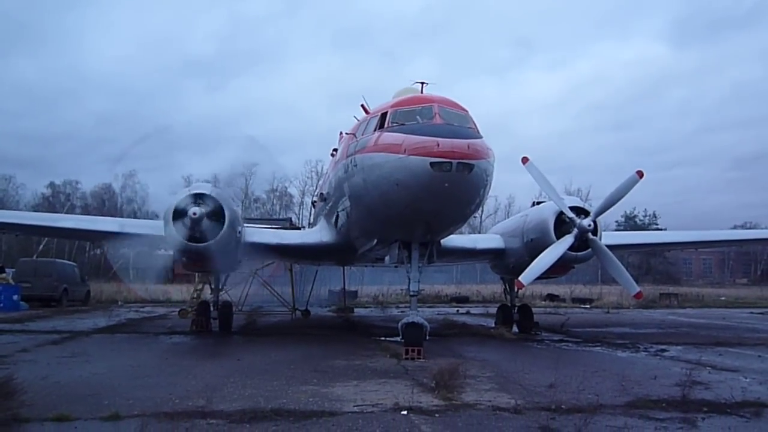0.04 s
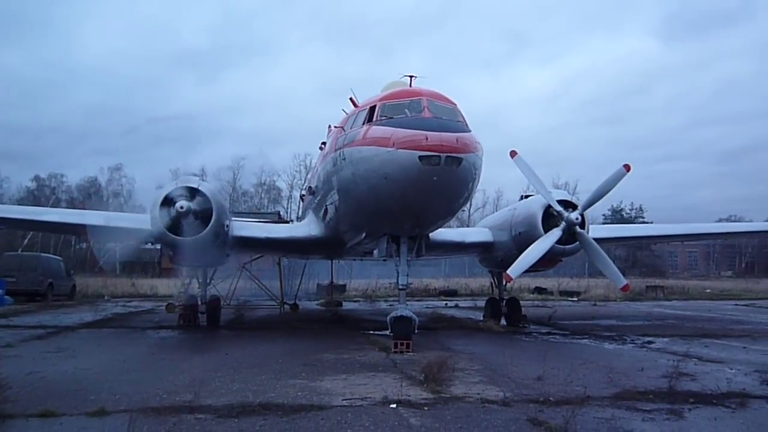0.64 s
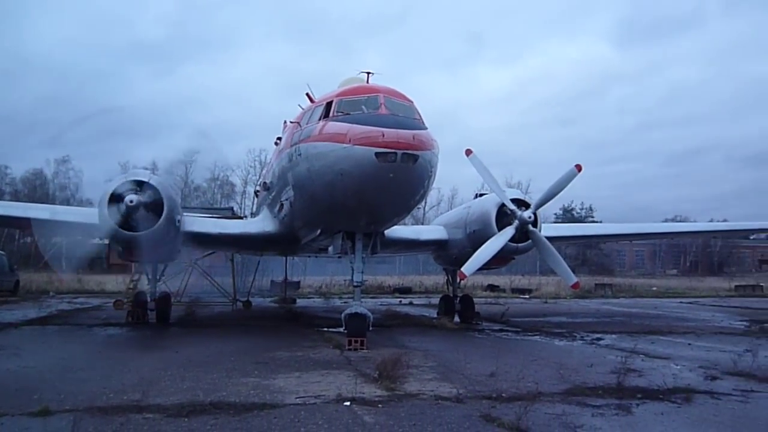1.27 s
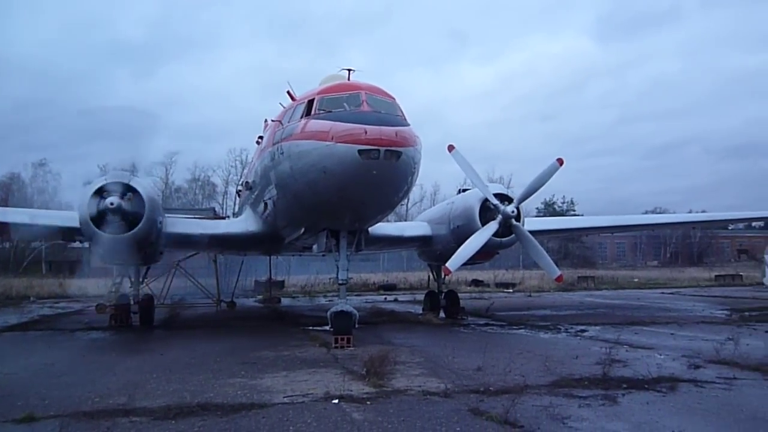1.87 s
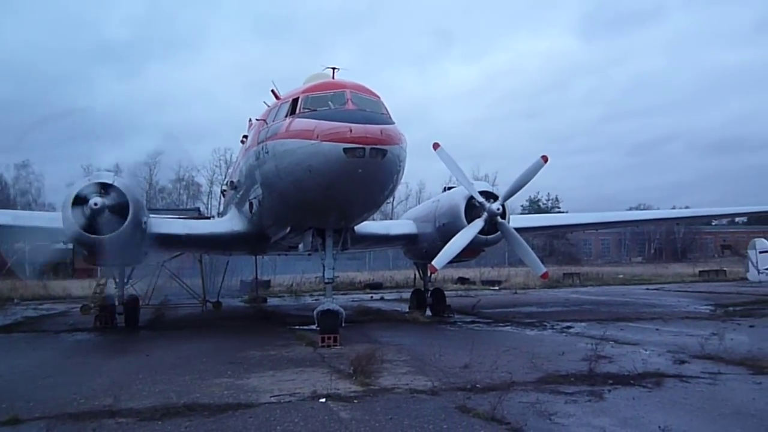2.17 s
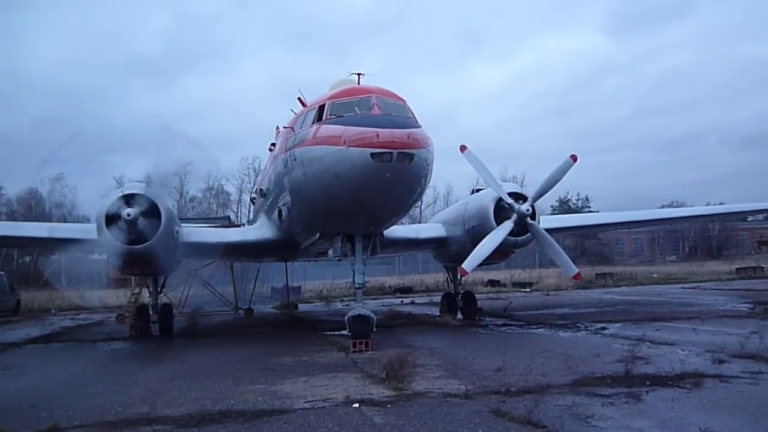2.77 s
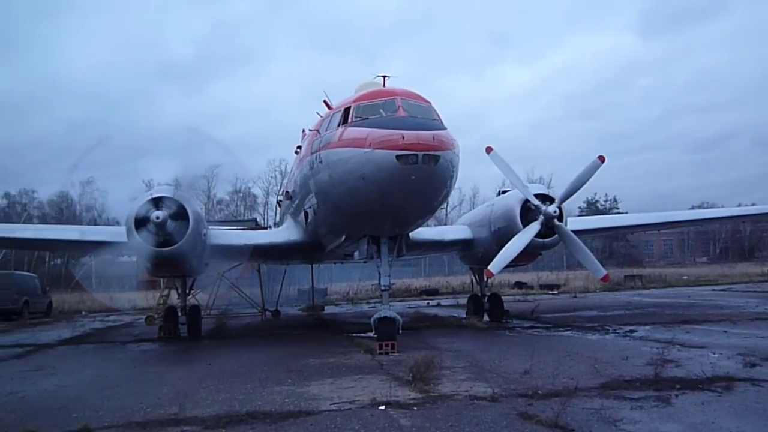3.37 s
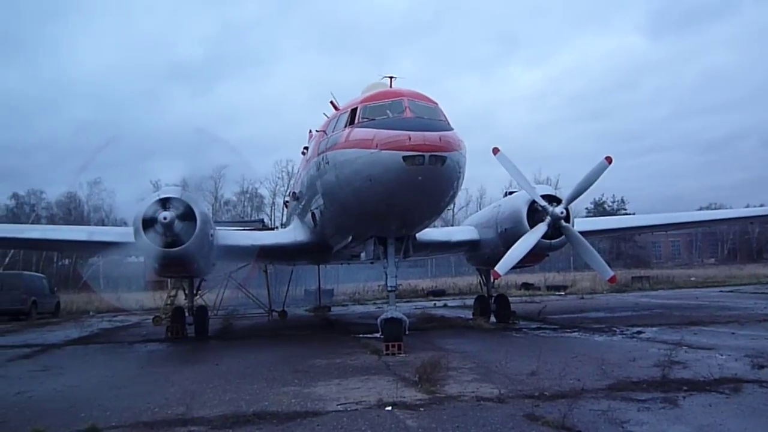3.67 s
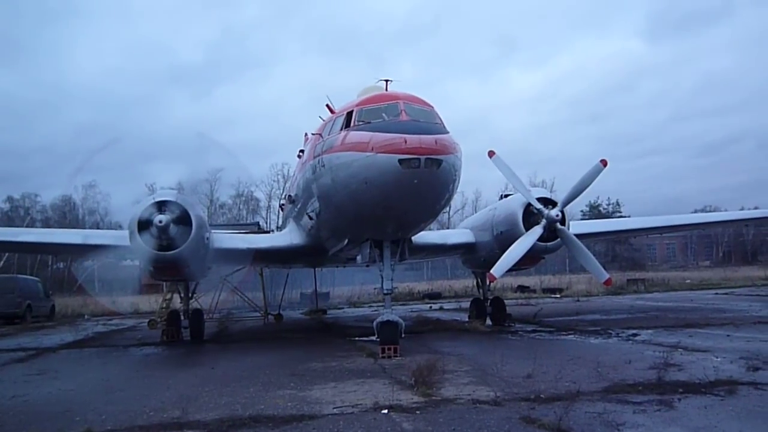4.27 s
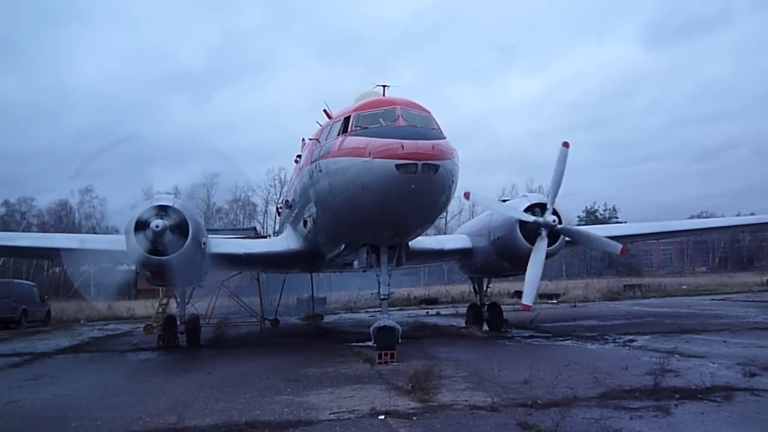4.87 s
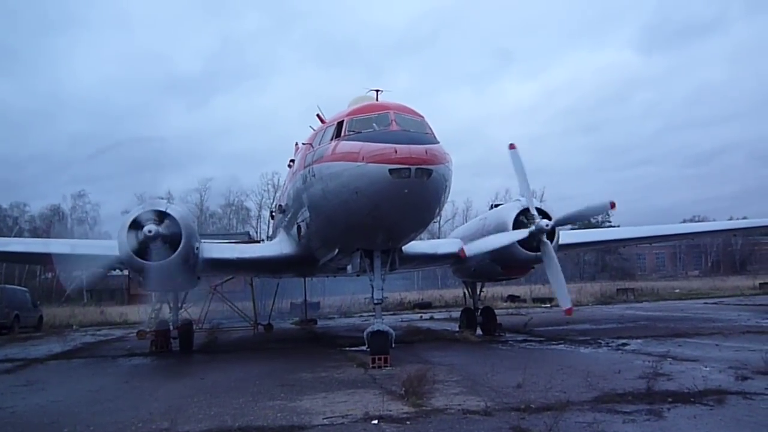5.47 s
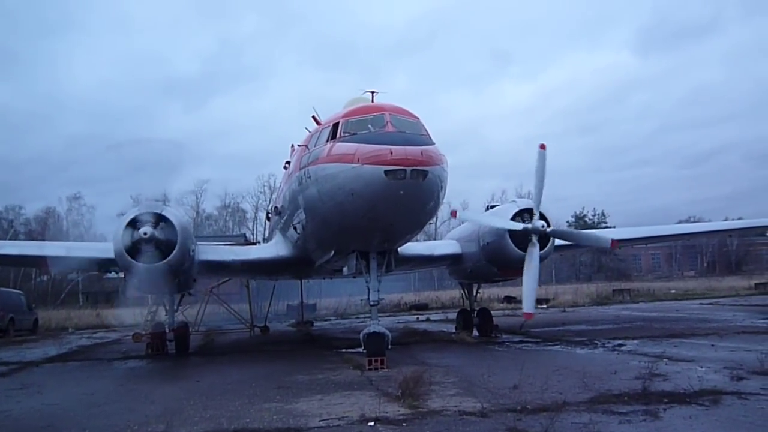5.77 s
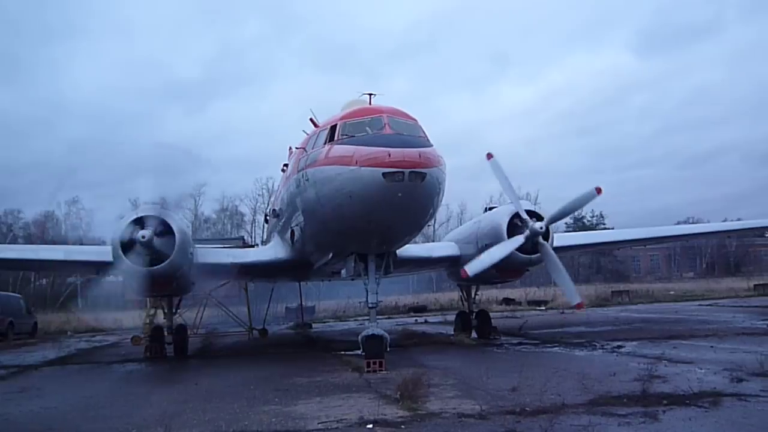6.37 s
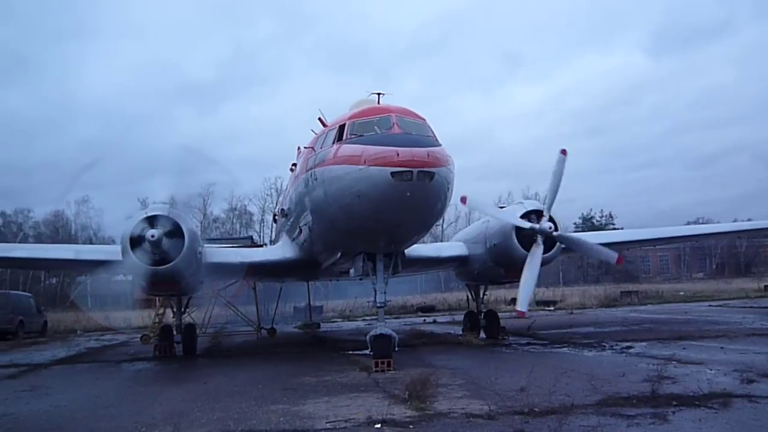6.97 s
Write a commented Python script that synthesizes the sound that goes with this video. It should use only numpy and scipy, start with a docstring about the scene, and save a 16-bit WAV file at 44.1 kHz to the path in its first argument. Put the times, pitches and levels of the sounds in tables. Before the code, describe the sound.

A large radial piston aircraft engine idles on an open airfield apron, heard from in front of the nose through a small microphone. Its fast, low thumping beat runs throughout, with a throaty exhaust bark, a hollow rasp and clattering valves. Irregular bangs and dry cracks stick out, and the beat stumbles more in the second half. Underneath, the propeller churns the air with a steady rush.

```python
"""Radial engine idling on an apron

One engine of a parked twin-engined aircraft, in the open, on a small camera microphone in front of the nose.
Seven cylinders thump and bark unevenly through the near exhaust; the other seven fire in between, out of
the far side. Valve gear clatters under the cowling, ground and airframe echo, the propeller churns the air."""
import sys
import numpy as np
from scipy import signal
from scipy.fft import rfft, irfft
from scipy.io import wavfile
from scipy.ndimage import uniform_filter1d

SR = 44100
rng = np.random.default_rng(int(sys.argv[2]) if len(sys.argv) > 2 else 0)


def to_wav(s):
    """Save 16-bit WAV."""
    ch = np.atleast_2d(s).T  # columns
    pcm = np.round(np.clip(ch, -1, 1) * 32767)  # PCM
    wavfile.write(sys.argv[1], SR, pcm.astype(np.int16))


N = 314874
TIME = np.arange(N) / SR

# idle speed: (time [s], near-side firings [1/s])
IDLE_SPEED = [(0.0, 41.09), (0.56, 41.53), (0.84, 40.94), (1.4, 41.36), (1.54, 40.93), (2.1, 41.18),
              (2.38, 40.18), (2.52, 40.41), (3.22, 39.65), (3.36, 39.99), (3.92, 40.01), (4.06, 39.55),
              (4.34, 40.09), (4.62, 39.88), (4.9, 39.06), (5.04, 39.72), (5.18, 39.32), (5.74, 39.31),
              (5.88, 40.13), (6.3, 40.32), (6.58, 38.84), (7.14, 40.28)]
def crankshaft():
    """Running count of near-side firings: the beat that the engine's layers follow."""
    firing_hz, = in_time(IDLE_SPEED)
    return np.cumsum(firing_hz) / SR - .188


# the seven cylinders of one exhaust, in firing order: (relative level [dB])
CYLINDER_DB = [0.3, -0.9, 0.4, 0.3, 0.8, -0.4, -0.6]
def strokes(phase, lag, jitter_s, spread_db):
    """Times and sizes of one event a firing, `lag` of a period late; no two burn alike."""
    number = np.arange(int(phase[-1] - lag) + 1)
    timing, strength = rng.standard_normal((len(number), 2)).T
    times = np.interp(number + lag, phase, TIME) + jitter_s * timing
    level_db = np.array(CYLINDER_DB)[number % len(CYLINDER_DB)] + spread_db * np.minimum(strength, 1)
    return times, from_db(level_db)


# firm runs and weak, stumbling ones: (time [s], relative level [dB])
BEAT_LEVEL = [(0.01, -24), (0.05, -15.9), (0.44, -15), (0.56, -18), (0.9, -15.5), (1.05, -16),
              (1.29, -14.5), (1.95, -17), (2.54, -20), (2.81, -15.5), (3.31, -16), (3.94, -20), (4.24, -12),
              (4.49, -26.5), (4.62, -19.5), (4.84, -23), (4.95, -18.5), (5.33, -11), (5.58, -22.5),
              (5.73, -14.5), (5.81, -31.5), (5.98, -26.5), (6.06, -14), (6.16, -24), (6.28, -24.5),
              (6.71, -24.2), (6.86, -15), (7.09, -20.5)]
# a cylinder fails to fire: (time [s])
MISFIRES = [.756, 2.513, 3.564, 3.738]
# a cylinder bangs hard: (time [s], peak level [dB])
BANGS = [(0.052, -10), (0.948, -15), (0.9742, -13), (1.004, -12.5), (1.2891, -12), (1.6311, -10.0),
         (1.7284, -13.5), (1.8238, -8.5), (1.8503, -11.5), (2.2883, -11.5), (2.61, -14), (2.6352, -12),
         (2.9838, -8.5), (3.3064, -11), (3.537, -12), (3.8381, -10.5), (3.8634, -12.5), (4.0878, -14),
         (4.1643, -14), (4.2351, -11.5), (4.3345, -17.5), (5.0179, -14), (5.3, -18), (5.3502, -16),
         (5.3739, -13.5), (5.3991, -13), (6.3128, -17), (6.429, -16), (6.5015, -16.5), (6.5204, -13),
         (6.5455, -14.5), (6.7518, -13), (6.9656, -15.5)]
# pressure pulse of one firing: (frequency [Hz], relative level [dB])
THUMP_SPECTRUM = [(30, -42.5), (60, -26.5), (97, -12), (120, 2), (142, -4), (165, -1.5), (205, 2),
                  (240, -3.5), (300, -11.5), (380, -11), (490, -14), (650, -27), (1200, -43), (8000, -78.5)]
def thumps(phase):
    """The main beat, nearest the microphone: one dry pulse a firing, with the odd misfire or hard bang."""
    times, sizes = strokes(phase, lag=0, jitter_s=.00015, spread_db=1.7)
    sizes *= from_db(np.interp(times, *np.transpose(BEAT_LEVEL)) + 1)
    for misfire_s in MISFIRES:
        sizes[np.argmin(np.abs(times - misfire_s))] *= from_db(-6.5)
    bang_s, bang_db = np.transpose(BANGS)
    sizes[np.argmin(np.abs(times[:, None] - bang_s), axis=0)] = 0   # a bang replaces the nearest thump
    return struck(np.r_[times, bang_s], np.r_[sizes, from_db(bang_db)], THUMP_SPECTRUM)


# gas rumbling in the pipe: (frequency [Hz], relative level [dB])
BURBLE_SPECTRUM = [(30, -33.5), (60, -10), (95, -8.5), (120, 3), (165, -2), (230, -1), (290, -9.5),
                   (350, -16), (700, -42.5), (8000, -91)]
# the pipe's loping resonance: (time [s], centre [Hz], relative level [dB])
BOOM_LOPE = [(0.0, 143, -25), (0.24, 167, -33), (0.3, 197, -32), (0.46, 164.5, -27.5), (0.58, 142, -29.5),
             (0.76, 181, -28.5), (0.84, 150, -30), (1.02, 159, -19), (1.14, 156.6, -34),
             (1.24, 176.5, -28.5), (1.46, 164, -28.5), (1.68, 172, -29), (1.74, 166.5, -30.8),
             (1.82, 151, -26.7), (1.86, 163, -31.8), (1.96, 163, -25), (2.26, 181, -25.5),
             (2.4, 160.6, -25.5), (2.46, 179.5, -27.5), (2.72, 170, -24.5), (2.94, 166, -28.5),
             (3.02, 182.4, -26.5), (3.2, 150.6, -28), (3.34, 161.6, -30), (3.62, 153.6, -23),
             (3.74, 158.6, -30.5), (4.0, 165, -28.5), (4.5, 171, -22.5), (4.54, 157.5, -20.5),
             (4.64, 163.4, -26.5), (4.68, 163, -27), (4.9, 161.6, -23), (5.0, 156, -22), (5.16, 157, -27.5),
             (5.34, 160.4, -26.5), (5.4, 177, -27), (5.54, 144.4, -27.5), (5.76, 196, -23),
             (5.82, 203, -25), (5.88, 167, -25), (6.48, 171.6, -22), (6.7, 153.6, -27), (6.78, 180, -19),
             (6.84, 158.6, -26.5), (6.98, 154, -20), (7.12, 162, -26.5)]
def pipe_boom(phase):
    """Burning gas burbles and booms in the near pipe after each firing."""
    gas = bursts(*strokes(phase, lag=0, jitter_s=.001, spread_db=3), decay_s=.014)
    burble = rms_one(colour(gas, BURBLE_SPECTRUM))
    boom_hz, boom_db = in_time(BOOM_LOPE)
    resonance = sweep(burble, boom_hz, width_hz=73)
    return from_db(boom_db - 3.5) * even(resonance + from_db(3.5) * burble)


# throat of the near exhaust: (frequency [Hz], relative level [dB])
BARK_SPECTRUM = [(30, -68), (150, -27.5), (255, -17.5), (325, -4), (400, 0), (490, -3.5), (640, -14.5),
                 (900, -20), (1500, -40.5), (3000, -39), (8000, -66.5)]
# rise and fall of the bark: (time [s], relative level [dB])
BARK_LEVEL = [(0, -31), (0.7, -25), (1.25, -29.5), (1.45, -30), (2.0, -25.5), (2.3, -31), (2.85, -31),
              (3.4, -35.5), (3.7, -32.5), (3.8, -35), (3.95, -37), (4.22, -27.5), (4.5, -35.5), (5.1, -39),
              (5.4, -35.5), (5.7, -31), (5.79, -39), (6.15, -45.5), (6.4, -31), (7.14, -43.5)]
def bark(phase):
    """Gas leaves the near exhaust with a throaty bark; uneven burning makes it flutter slightly."""
    gas = puffs(*strokes(phase, lag=0, jitter_s=.0002, spread_db=1.5), turbulence=.25, decay_s=.008)
    level_db = in_time(BARK_LEVEL)[0] - 2.5 - .1 * drift(5.7)
    return from_db(level_db) * even(colour(gas, BARK_SPECTRUM))


# singing pipe modes: (start [s], end [s], multiple of the beat, level [dB])
PIPE_TONES = [(0, .38, 7, -38), (0, 0.393, 12, -44), (0.548, 0.804, 10, -35.5), (.65, 1.015, 12, -45),
              (1.714, 2.1, 12, -43.5), (1.735, 2.203, 7, -35.5), (2.291, 2.766, 7, -34),
              (2.804, 3.368, 6, -45), (3.155, 3.475, 10, -34.5)]
def pipe_tones(phase):
    """Brief wavering tones where a pipe mode locks on to the beat."""
    fade_s = .084
    tones = np.zeros(N)
    for start, end, multiple, db in PIPE_TONES:
        swell = np.clip(np.minimum(TIME - start, end - TIME) / fade_s, 0, 1)
        tone = np.sin(2 * np.pi * multiple * phase + .22 * drift(5))
        tones += np.sqrt(2) * from_db(db) * swell * tone
    return tones


# sharp cracks: (time [s], peak level [dB])
CRACKS = [(.821, -17), (.896, -11.5), (.966, -17), (1.482, -16), (2.455, -17), (2.908, -13), (3.184, -15.5),
          (4.53, -13), (4.72, -14), (5.655, -15.5), (5.681, -19), (5.757, -10.5), (5.782, -12.5),
          (5.809, -10.5), (5.884, -16.5), (5.911, -12), (5.986, -10.5), (6.038, -16), (6.113, -12.5),
          (6.716, -12), (6.862, -12.5)]
# colour of one crack: (frequency [Hz], relative level [dB])
CRACK_SPECTRUM = [(100, -15), (450, 4), (680, -3), (900, 2.5), (1250, -0.5), (1550, -20.5), (2000, -18),
                  (4000, -32.5), (8000, -59.5)]
def cracks():
    """Short, dry cracks that stand out of the beat."""
    times, db = np.transpose(CRACKS)
    return struck(times, from_db(db), CRACK_SPECTRUM)


# the exhaust from the far side: (frequency [Hz], relative level [dB])
RASP_SPECTRUM = [(30, -37.5), (48, -18.5), (80, -14), (125, 9), (200, -11), (320, -5), (390, -1),
                 (480, -2.5), (640, -7.5), (800, -1), (1120, -9.5), (1500, -19), (3000, -28.5),
                 (8000, -56.5)]
# swell of the rasp: (time [s], level [dB before scaling by depth])
RASP_SWELL = [(0.0, 6.7), (0.15, -3.5), (0.9, -4), (1.26, 4.5), (1.42, -4), (1.62, 2), (1.88, -4.5),
              (2.15, 1), (2.61, 4.5), (3.1, -2), (3.55, 2.5), (3.92, -2.5), (4.09, 5), (4.28, -6.5),
              (4.51, 3), (4.9, 4.5), (5.12, 0.2), (5.72, 6.5), (5.8, 0), (5.99, 5.5), (6.15, 1.2),
              (6.85, 5), (7.14, 1.5)]
# hollow ring in the rasp: (time [s], level [dB])
RING_LEVEL = [(0, -48), (0.3, -31.5), (0.95, -32), (1.3, -37.5), (1.45, -39), (2.4, -40.5), (2.68, -36),
              (2.9, -39), (3.9, -42), (4.08, -44), (4.28, -43), (4.7, -41), (5.1, -46.5), (5.55, -45.5),
              (5.72, -35.5), (5.85, -36.5), (6.05, -38.5), (6.2, -40.5), (7.14, -48.5)]
def far_exhaust(phase, depth=.82):
    """Both cylinder rows reach the microphone round the nacelle: twice the beat, raspy and hollow."""
    first = puffs(*strokes(phase, lag=.9, jitter_s=.0003, spread_db=1.5), turbulence=1.3, decay_s=.013)
    second = puffs(*strokes(phase, lag=.48, jitter_s=.0008, spread_db=2), turbulence=1.7, decay_s=.013)
    rasp = even(colour(first + from_db(2.5) * second, RASP_SPECTRUM))
    rasp_db = -28.5 + depth * in_time(RASP_SWELL)[0]
    ring_hz, width_hz = 815, 200
    ring = even(resonate(resonate(first, ring_hz, width_hz), ring_hz, width_hz))
    return from_db(rasp_db) * rasp + from_db(in_time(RING_LEVEL)[0]) * ring


# valve taps: (frequency [Hz], relative level [dB])
CLATTER_SPECTRUM = [(500, -17), (900, 5), (1250, 4), (1550, -7.5), (1900, 2), (2400, -7), (3200, -11),
                    (4300, -17), (4800, -27), (6600, -30), (7500, -30.5), (8500, -53.5)]
# swell of the clatter: (time [s], level [dB before scaling by depth])
CLATTER_SWELL = [(0.0, -0.5), (1.93, -0.3), (2.07, 2.1), (3.23, 0.8), (4.37, 1), (4.74, 4), (5.32, 2),
                 (5.57, 4.5), (5.8, -3), (5.96, 4.5), (7.14, 3)]
# cowling and cylinder resonances: (frequency [Hz], width [Hz], relative level [dB])
COWLING_MODES = [(815, 190, -17), (1777, 90, 0.5), (2005, 160, 3)]
def valve_gear(phase, depth=.72):
    """Inlet and exhaust valves snap shut and set the cylinders and cowling ringing."""
    inlet = bursts(*strokes(phase, lag=.78, jitter_s=.00038, spread_db=4), decay_s=.029)
    outlet = bursts(*strokes(phase, lag=.3, jitter_s=.0024, spread_db=6.5), decay_s=.041)
    taps = colour(inlet + from_db(-4.5) * outlet, CLATTER_SPECTRUM)
    ringing = sum(from_db(db - 9.5) * resonate(taps, hz, width) for hz, width, db in COWLING_MODES)
    level_db = -35.5 + depth * in_time(CLATTER_SWELL)[0]
    return from_db(level_db) * rms_one(taps + ringing)


# knocks in the cowling: (time [s], relative level [dB])
CLINKS = [(2.04, -23.5), (3.029, -19.5), (4.891, -18.5), (4.939, -18.5), (4.976, -25), (5.977, -16.5),
          (6.002, -19.5), (6.039, -24), (6.331, -17)]
def clinks():
    """Single hard knocks ring the cowling's metal modes."""
    times, db = np.transpose(CLINKS)
    knocks = clicks(times, from_db(db))
    return sum(from_db(mode_db - 12) * SR / (2 * np.pi * width) * resonate(knocks, hz, width)
               for hz, width, mode_db in COWLING_MODES)


# hum at three times the beat: (time [s], level [dB])
HUM_LEVEL = [(0, -38), (.7, -37), (.97, -28), (1.15, -36), (2.2, -37), (2.65, -29), (2.9, -38), (3.5, -31),
             (3.9, -38), (4.3, -38), (4.6, -29), (5, -26), (5.4, -29), (5.7, -38), (6.3, -29), (6.5, -36),
             (7.14, -32)]
# tone at the firing rate of all fourteen cylinders: (time [s], level [dB])
THROB_LEVEL = [(0, -29), (1.6, -32.5), (2.3, -34.5), (3.5, -35), (5.2, -31), (6.2, -30.5), (7.14, -30.5)]
def throb(phase):
    """Smooth low tones under the exhaust, locked to the crankshaft."""
    crank = 2 * np.pi * phase * 2 / 7 + .02 * drift(5)   # two turns to seven near-side firings
    hum = np.sin(2 * np.pi * 3 * phase + .6 * drift(3))
    hum *= from_db(in_time(HUM_LEVEL)[0] + 1.5 * drift(4))
    firing = from_db(in_time(THROB_LEVEL)[0] + 2 * drift(3.9)) * np.sin(7 * crank)
    fourth_order = from_db(-44 + 1.8 * drift(9.4)) * np.sin(4 * crank)
    return hum + firing + fourth_order


# churned air: (frequency [Hz], relative level [dB])
WASH_SPECTRUM = [(25, -26.5), (45, -8.5), (70, -3.5), (105, -3.5), (140, -2), (320, -4), (390, 1.5),
                 (490, -1.5), (640, -5.5), (840, -11), (1550, -20.5), (2000, -18.5), (4300, -26.5),
                 (4800, -38), (6600, -34), (8500, -63)]
# swell of its hiss: (time [s], relative level [dB])
HISS_SWELL = [(0, 0.5), (1.8, 0.5), (2.6, 2.5), (3.1, 0), (3.9, 1), (4.6, -1.5), (5.4, -3), (6.0, 1),
              (7.14, 1)]
def propeller_wash():
    """Rush of air churned by the blades, heard from the front, its hiss swelling a little."""
    rush = rms_one(colour(rng.standard_normal(N), WASH_SPECTRUM))
    hiss = signal.sosfiltfilt(signal.butter(2, 2400, "high", fs=SR, output="sos"), rush)
    return from_db(-33) * (rush - hiss + from_db(in_time(HISS_SWELL)[0]) * hiss)


# echoes off ground, nacelle, wing and fuselage: (delay [s], gain)
ECHOES = [(.0037, .08), (.0082, -.07), (.0125, .1), (.0172, .08)]
def apron(x, scatter_db, t60, sway_s):
    """Close echoes swayed by the slipstream, then a faint dull scatter from trees and sheds farther off."""
    near = sum(gain * np.interp(TIME - delay - sway_s * drift(1.19), TIME, x, left=0)
               for delay, gain in ECHOES)
    age = TIME[:SR // 2]
    tail = rng.standard_normal(len(age)) * from_db(-60 * age / t60) * (age > .02)
    tail = signal.sosfilt(signal.butter(1, 2500, fs=SR, output="sos"), tail)
    scatter = rms_one(signal.fftconvolve(x, tail)[:N])
    return x + near + from_db(scatter_db) * np.std(x) * scatter


def puffs(times, sizes, turbulence, decay_s):
    """Each exhaust valve lets out a pressure pulse followed by a turbulent rush of gas."""
    return clicks(times, sizes) + turbulence * bursts(times, sizes, decay_s)


def struck(times, sizes, spectrum):
    """Short blows of the given spectrum, each peaking at its size."""
    peak = np.abs(colour(clicks(np.zeros(1), np.ones(1)), spectrum)).max()
    return colour(clicks(times, sizes), spectrum) / peak


def bursts(times, sizes, decay_s):
    """A dying burst of noise at each time, with the energy of a click of that size."""
    r = np.exp(-2 / (decay_s * SR))
    power = signal.lfilter([1 - r], [1, -r], clicks(times, sizes ** 2) + 1e-18)
    return np.sqrt(power) * rng.standard_normal(N)


def clicks(times, sizes):
    """A click of the given size at each time."""
    return np.bincount(np.clip(times * SR, 0, N - 1).astype(int), sizes, N)


def colour(x, spectrum):
    """Causal (minimum-phase) filter with the given spectrum."""
    size = 8192
    hz, db = np.transpose(spectrum)
    grid = np.maximum(np.fft.rfftfreq(size, 1 / SR), 1)
    gain = from_db(np.interp(np.log(grid), np.log(hz), db))
    cepstrum = irfft(np.log(gain))
    cepstrum[1:size // 2] *= 2
    cepstrum[size // 2 + 1:] = 0
    return signal.fftconvolve(x, irfft(np.exp(rfft(cepstrum))))[:N]


def resonate(x, hz, width_hz):
    """Two-pole resonance with gain 1 on top."""
    r = np.exp(-np.pi * width_hz / SR)
    feedback = [1, -2 * r * np.cos(2 * np.pi * hz / SR), r * r]
    return signal.lfilter(np.array([1, 0, -1]) * (1 - r * r) / 2, feedback, x)


def sweep(x, hz, width_hz):
    """Resonance whose centre follows a curve, stepped in short blocks."""
    size = 64
    out, state = np.zeros(N, complex), [0j]
    for i in range(0, N, size):
        pole = np.exp((2j * np.pi * hz[i] - np.pi * width_hz) / SR)
        out[i:i + size], state = signal.lfilter([1], [1, -pole], x[i:i + size], zi=state)
    return rms_one(out.real)


def drift(rate_hz):
    """Slow random wander of spread 1."""
    step = 100
    r = np.exp(-2 * np.pi * rate_hz * step / SR)
    slow = signal.lfilter([1], [1, -2 * r, r * r], rng.standard_normal(2 * N // step))
    return np.interp(np.arange(N, 2 * N) / step, np.arange(len(slow)), rms_one(slow))


def even(x):
    """Hold the level at rms 1 over a few firings."""
    return x / np.sqrt(uniform_filter1d(x ** 2, size=SR // 8) + 1e-9)


def rms_one(x):
    """Scale to unit rms."""
    return x / np.sqrt(np.mean(x ** 2) + 1e-20)


def in_time(rows):
    """Each column of a curve at every sample."""
    times, *columns = np.transpose(rows)
    return [np.interp(TIME, times, column) for column in columns]


def from_db(db):
    """Decibels to gain."""
    return 10 ** (np.asarray(db) / 20)


def scene():
    """In front of the nose, in mono: the engine and its echoes over the throb and the wash."""
    phase = crankshaft()
    near_exhaust = pipe_boom(phase) + bark(phase) + thumps(phase) + pipe_tones(phase)
    engine = near_exhaust + cracks() + far_exhaust(phase) + valve_gear(phase) + clinks()
    return (apron(engine, scatter_db=-12.5, t60=.97, sway_s=.00038) + throb(phase) + propeller_wash())[None]


def record(dry):
    """A small camera microphone: rounded peaks, no deep bass, no top."""
    ceiling, low_hz, high_hz = .65, 32, 8400
    rounded = ceiling * np.tanh(dry / ceiling)
    thin = signal.sosfilt(signal.butter(3, low_hz, "high", fs=SR, output="sos"), rounded)
    return signal.sosfilt(signal.ellip(10, .3, 90, high_hz, fs=SR, output="sos"), thin)


dry = scene()
out = record(dry)
to_wav(out)
```